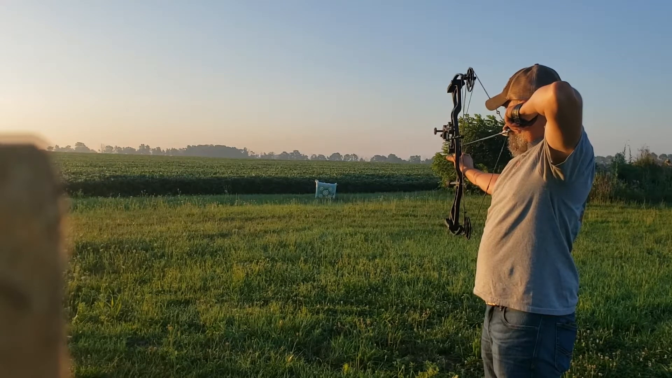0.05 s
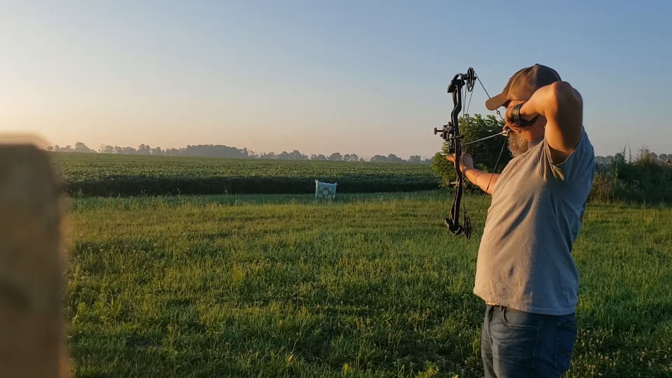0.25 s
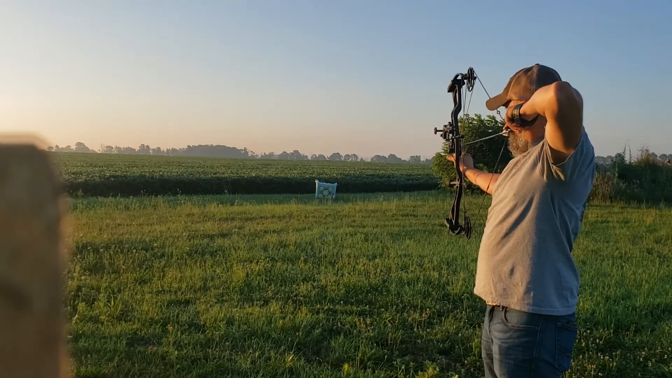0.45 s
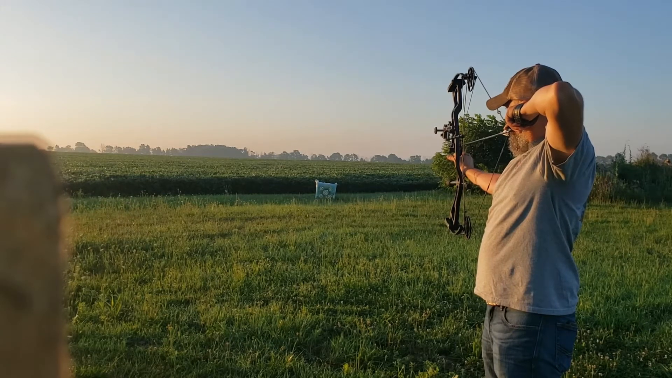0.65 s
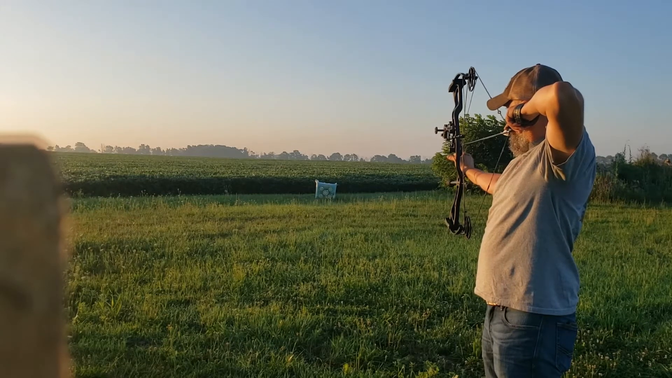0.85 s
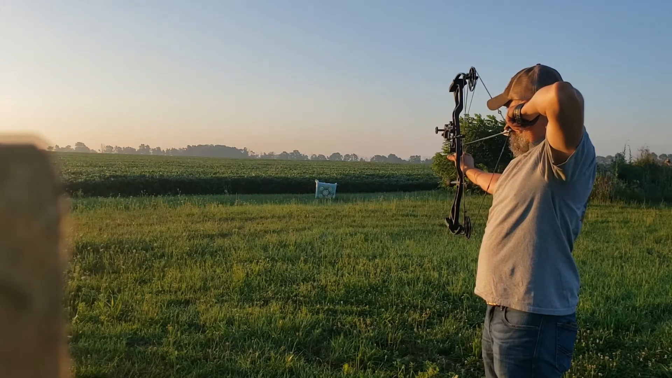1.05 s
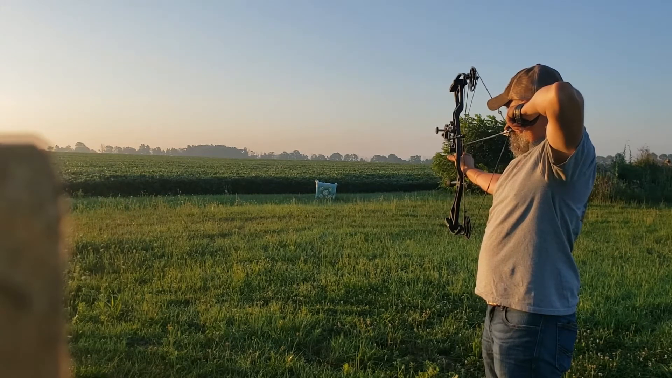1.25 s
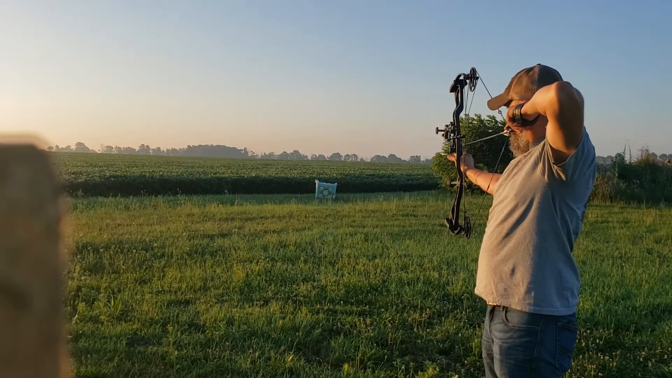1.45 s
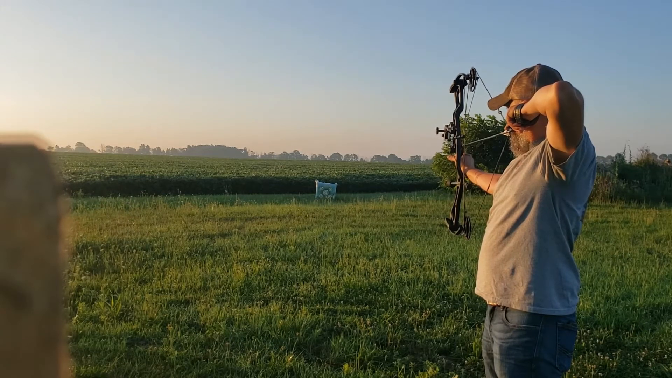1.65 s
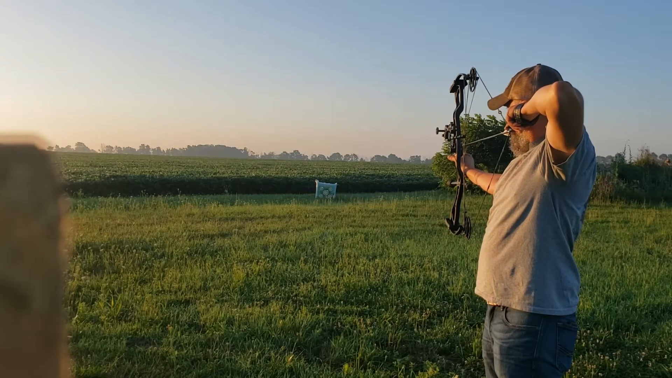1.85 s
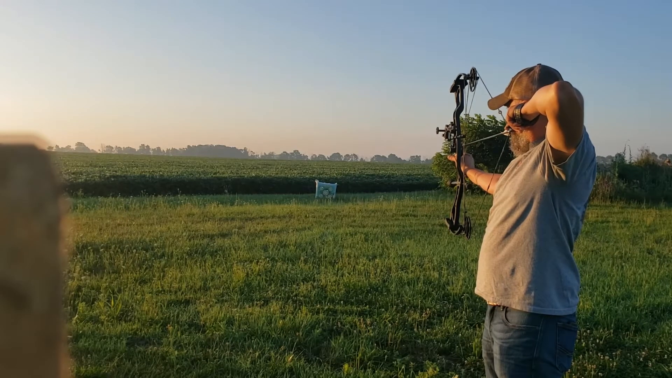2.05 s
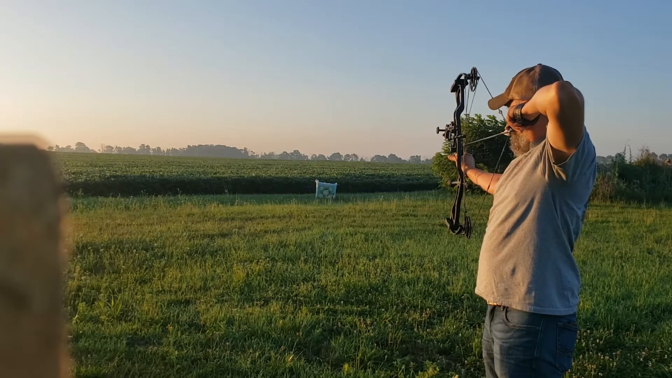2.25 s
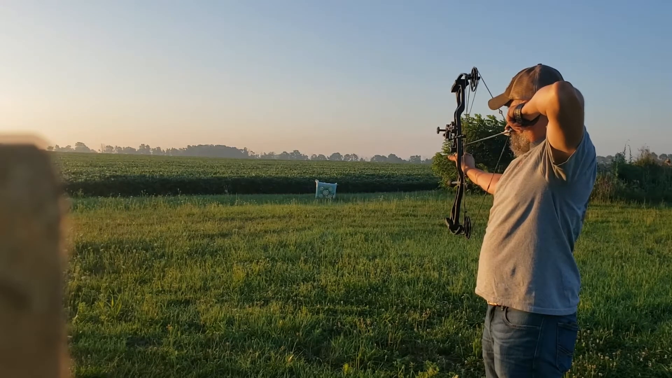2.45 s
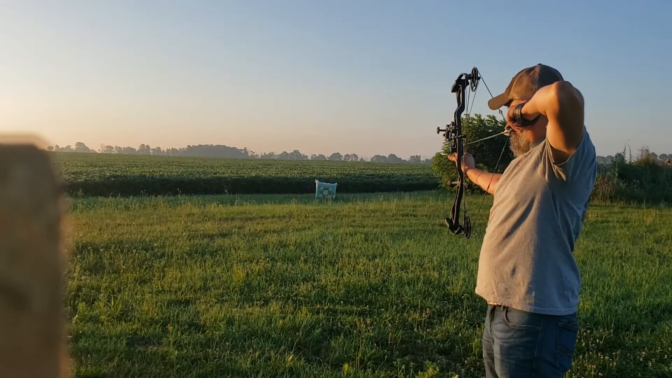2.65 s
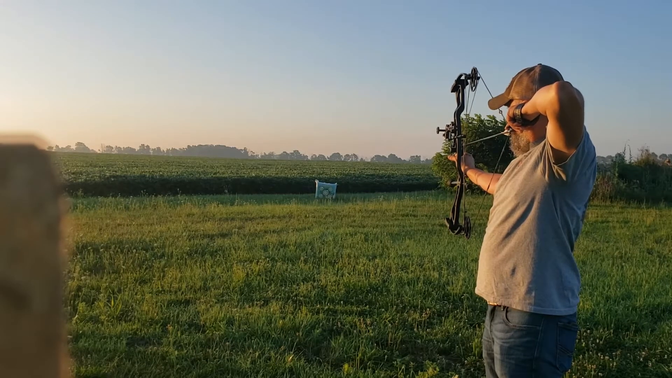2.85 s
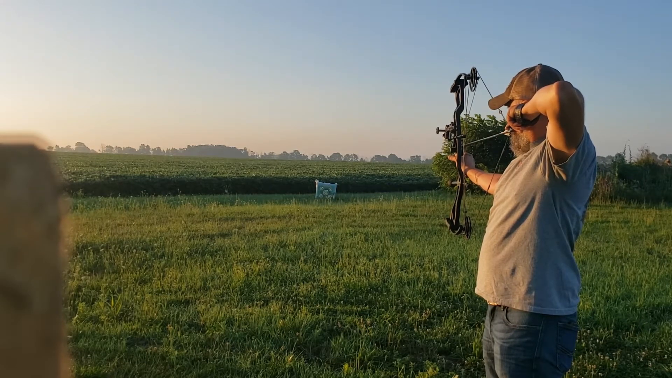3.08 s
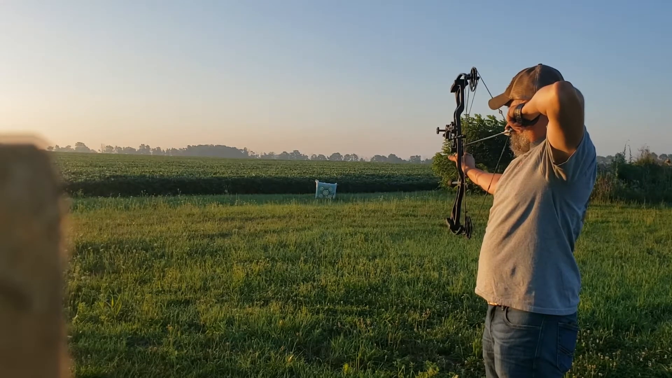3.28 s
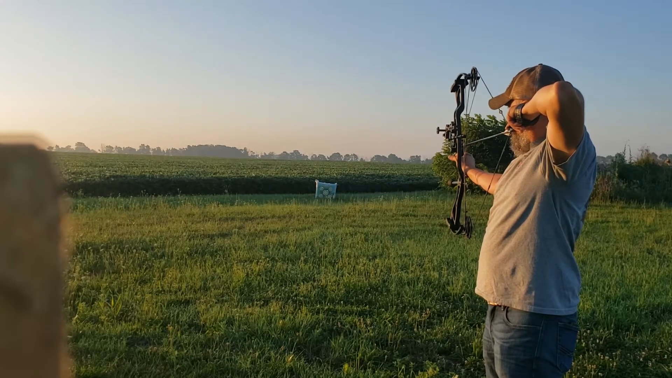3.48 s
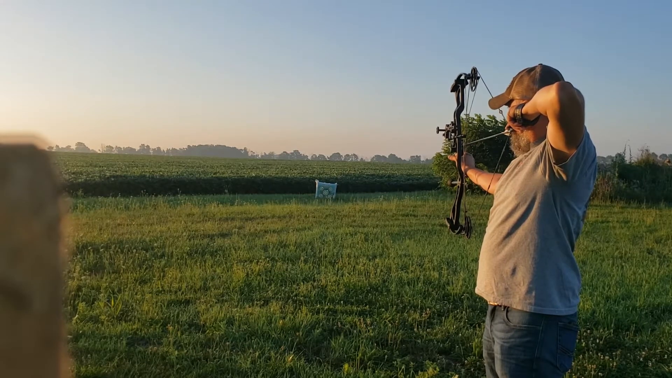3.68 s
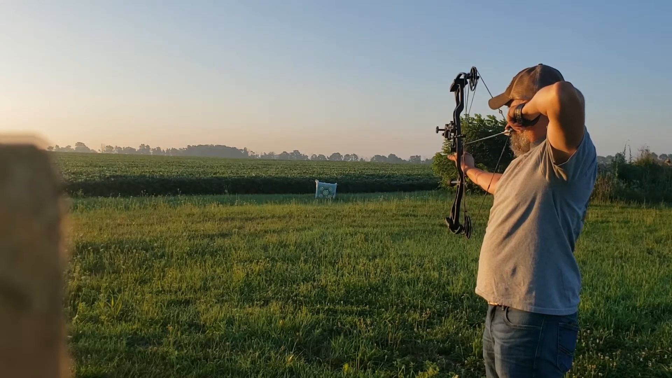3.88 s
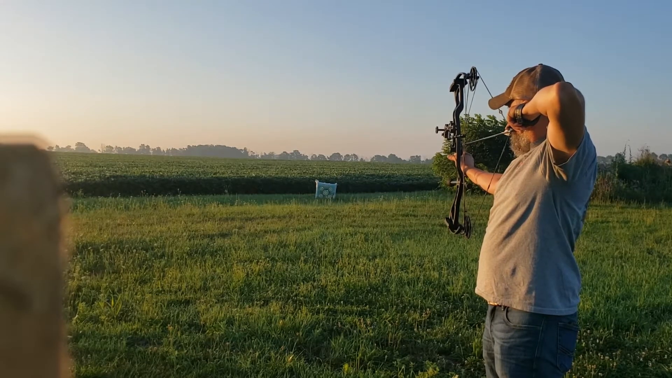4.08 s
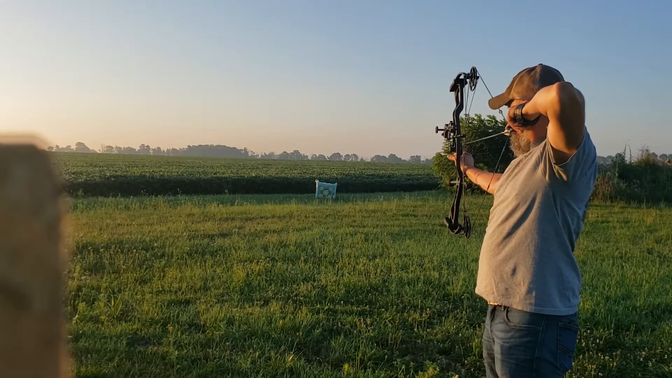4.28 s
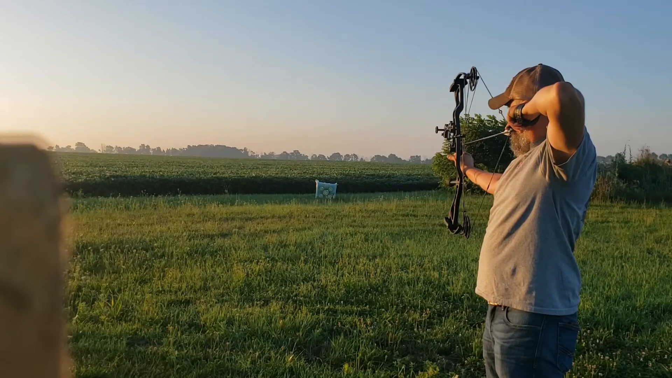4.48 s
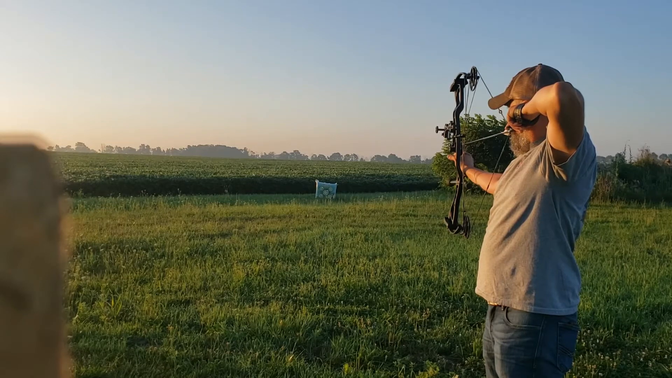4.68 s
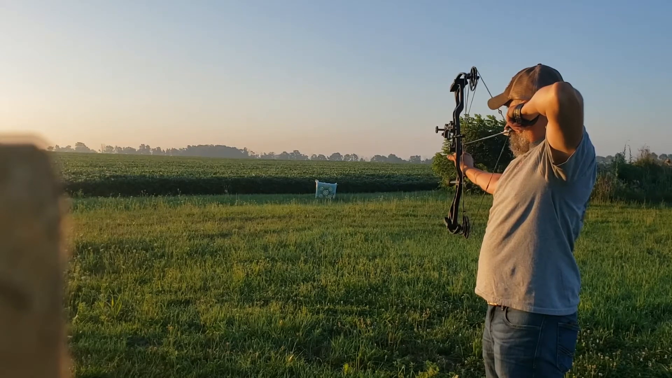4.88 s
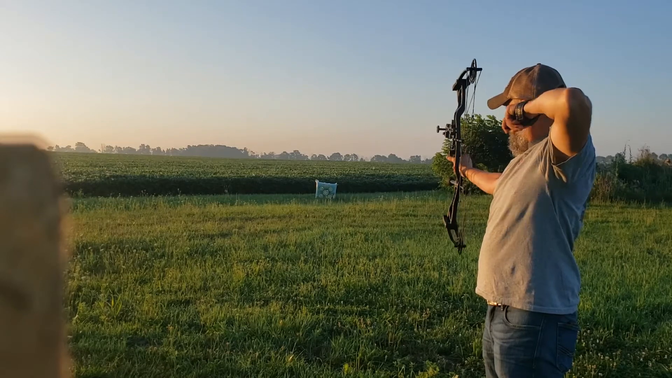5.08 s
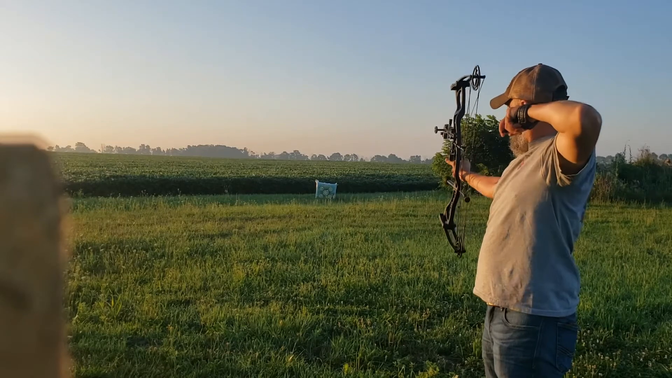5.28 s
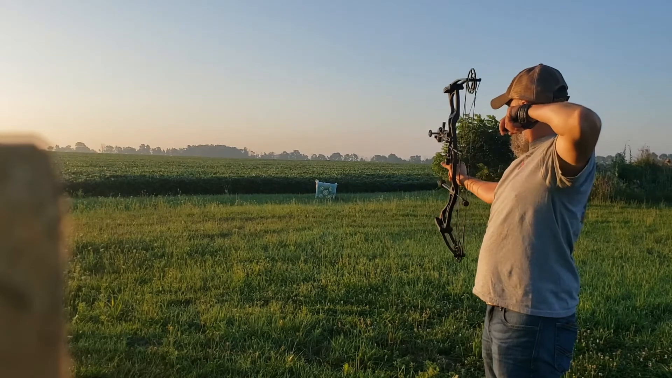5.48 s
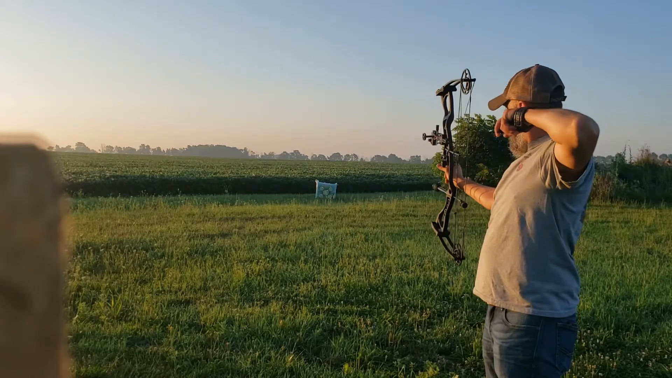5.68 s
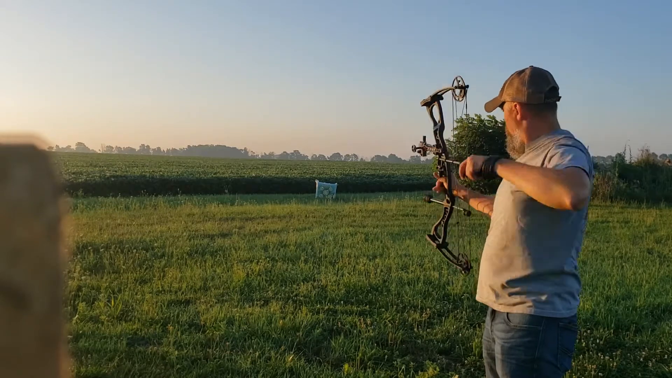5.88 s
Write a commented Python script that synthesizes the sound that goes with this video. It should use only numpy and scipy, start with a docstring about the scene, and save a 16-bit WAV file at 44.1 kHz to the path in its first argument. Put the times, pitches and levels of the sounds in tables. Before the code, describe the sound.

Soft wind and distant birdsong over an open field, then a compound bow snaps loudly and its arrow smacks a bag target.

```python
"""Light wind on the microphone and its hiss come first, with a short gritty rasp; small birds then whistle and
trill far off across an open field at dawn, as gliding sine notes over a blur of fainter peeps.
After two dry ticks close by, a compound bow is shot: the release aid clicks, the string rushes forward and slaps
its stop (hiss bursts), limbs and riser ring (decaying sines), and the arrow smacks a bag target (blows through
resonances, and thumps). Crop rows and a far tree line answer with decaying noise."""
import sys
import numpy as np
from scipy import signal
from scipy.fft import rfft, irfft, next_fast_len
from scipy.io import wavfile
from scipy.ndimage import map_coordinates

SR = 44100
rng = np.random.default_rng(int(sys.argv[2]) if len(sys.argv) > 2 else 0)


def unload_wav(signal):
    """Save mono or channel-first audio to the path in sys.argv[1] as 16-bit WAV at rate SR, clipped to [-1, 1]."""
    wavfile.write(
        sys.argv[1],
        SR,
        np.round(np.clip(np.atleast_2d(signal).T, -1, 1) * 32767).astype(np.int16),
    )


N = 261842

# Pan is left minus right. Levels are relative: gains, ports and distance effects may follow.
# wind buffeting on the microphone: time_s, level_db, pan_db
WIND = [(0, -58.5, -1), (.5, -55.5, 0), (1.05, -50.5, -9.5), (1.3, -57, -2), (1.6, -60.5, -1.5),
        (1.9, -55.5, -3), (2.6, -60, 0), (3.5, -57, -1.5), (4.2, -62.5, -1.5), (4.5, -62, -4.5),
        (4.9, -53, 5.5), (5.1, -54.5, -3), (5.66, -54, -3.5), (5.94, -59, -1)]
# spectrum of the wind and far rumble: frequency_hz, density_db (per Hz)
RUMBLE_SPECTRUM = [(12, -43), (20, -14.5), (49, -3.5), (70, 0), (140, -15), (266, -23), (398, -33),
                   (700, -51), (910, -77), (1540, -120)]
# spectrum of the hiss: frequency_hz, density_db (per Hz)
HISS_SPECTRUM = [(260, -34.5), (450, -9), (579, -12.5), (662, -12), (768, -13), (946, -13.5), (1520, -13),
                 (2110, -8.5), (3060, -17), (4180, -15.5), (5150, -18.5), (5800, -19.5), (6930, -29),
                 (13300, -16), (15700, -16.5)]
# likeness of the two ports in wind and hiss: frequency_hz, correlation (0-1)
PORT_LIKENESS = [(25, .5), (60, .8), (240, .85), (500, .4), (950, 0)]
# left-right lean of the hiss: frequency_hz, pan_db
HISS_LEAN = [(60, -1), (150, 4.5), (380, 0.5), (950, -0.5), (2380, -7.5), (5980, -5), (15000, 0)]
# how the housing shades the left port from bow and target: frequency_hz, pan_db
HOUSING_SHADOW = [(60, -6.5), (130, 0.5), (290, 0.5), (640, -5), (1410, 3), (3100, -10.5), (6820, -12),
                  (15000, -6)]
# left-right lean of the echoes: frequency_hz, pan_db
FIELD_LEAN = [(300, -2.5), (1400, -3), (3100, -4), (6800, -14.5), (15000, -5)]

# thin high rasps: start_s, length_s, centre_hz, width_hz, level_db
RASPS = [(0.021, 0.081, 7250, 900, -72.5), (1.336, 0.076, 7840, 900, -77.5),
         (3.615, 0.099, 10300, 2500, -79.5)]
# a blur of farther birds: time_s, level_db
CHORUS = [(0.8, -91.5), (1.4, -80), (3.45, -76), (4.0, -89.5)]
# figures the birds repeat, by name: pan_db, then notes as
# delay_s, length_s, first_hz, middle_hz, last_hz, level_db
FIGURES = { "arch": (-10, [(0, .042, 3950, 4500, 3800, 0), (.058, .022, 5600, 5200, 4400, 0.5)]),
           "dive": (-16, [(0, .04, 4750, 5370, 5360, -4), (.02, .05, 5000, 3350, 2800, -7),
           (.078, .036, 3600, 3880, 3800, 0.5)]), "skip": (-15, [(0, .04, 5060, 5320, 5460, 0),
           (.044, .022, 6700, 5450, 4550, -2), (.112, .048, 4100, 4330, 4060, -8)]),
           "sag": (-7, [(0, .046, 4800, 4380, 4270, 0)]), "flick": (-15, [(0, .07, 3900, 4480, 4600, -6),
           (.057, .038, 3720, 4460, 4900, 0), (.088, .016, 4830, 4340, 3950, 1.5)]),
           "drop": (-14, [(0, .035, 4750, 4050, 3650, 0)]), "slide": (-12, [(0, .059, 7500, 6900, 6100, 0),
           (.052, .05, 5900, 5700, 5650, 1.5)]), "squeak": (-18, [(0, .038, 6700, 7000, 7740, 0)]),
           "tew": (-17, [(0, .015, 5500, 5250, 5050, -7), (.011, .05, 5000, 4930, 4920, 0),
           (.074, .12, 5050, 4960, 4900, -11), (.228, .12, 4950, 4940, 4900, -17)]),
           "chirp": (-15, [(0, .033, 6100, 6070, 6070, 0), (.062, .05, 6070, 6060, 6050, -17)]),
           "chip": (0.6, [(0, .021, 3180, 3095, 3030, 0)])}
# figures sung one by one: start_s, figure, level_db
SONG = [(1.045, "slide", -94), (1.269, "arch", -84), (1.443, "arch", -78), (1.659, "dive", -73.5),
        (1.885, "dive", -76.5), (2.141, "sag", -76), (2.143, "skip", -72), (2.19, "squeak", -88),
        (2.431, "skip", -69), (2.456, "sag", -75), (2.594, "sag", -83), (3.075, "drop", -83),
        (3.166, "flick", -74), (3.363, "drop", -78), (3.44, "flick", -75), (3.626, "tew", -76),
        (3.96, "tew", -73.5), (4.28, "tew", -74.5)]
# figures sung at a steady pace: figure, start_s, period_s, levels_db (one each; None is skipped)
SERIES = [("chirp", 4.48, .169, [-72.5, -71, -74, -75]),
          ("chip", 4.366, .169, [-77, -77, -75.5, -73.5, None, -71])]
# notes held near one pitch: start_s, length_s, pitch_hz, level_db, pan_db
HELD = [(0.914, 0.04, 4700, -80, -4), (1.833, 0.051, 7090, -84.5, -17), (1.976, 0.033, 4910, -79.5, -16),
        (2.514, 0.086, 5320, -85.5, -19), (2.753, 0.13, 7390, -85.5, -16), (2.756, 0.16, 7940, -89, -20),
        (2.991, 0.25, 5290, -83.5, -19.5), (3.2, 0.41, 5290, -84, -20), (3.33, 0.34, 4830, -88.5, -19)]
# trills of quick upward sweeps:
# start_s, length_s, first_hz, middle_hz, last_hz, sweep_rate (per s), sweep_hz, level_db, pan_db
TRILLS = [(2.772, .172, 4750, 6350, 4500, 88, 1500, -70, -8),
          (3.32, .055, 5900, 6100, 6200, 200, 900, -76, -7),
          (3.595, .05, 6000, 6200, 6200, 200, 900, -77, -7),
          (3.725, .18, 3200, 3150, 3250, 60, 400, -87, 5), (3.735, .2, 2600, 2620, 2620, 60, 300, -86, 5),
          (4.05, .16, 3150, 3100, 3200, 60, 400, -87, 5), (4.055, .18, 2600, 2600, 2650, 60, 300, -86, 5)]
# tiny dry ticks close by: start_s, level_db
TICKS = [(4.655, -59), (4.825, -61)]

# contacts in the bow: start_s, kind, hiss_db, ring_db
BOW_CONTACTS = [(5.036, "click", -41.5, -76.5), (5.040, "click", -28, -68), (5.046, "rush", -40, -58),
                (5.055, "rush", -38.5, -51.5), (5.059, "rush", -24, -36), (5.0633, "crack", -12, -41),
                (5.0651, "slap", -15.5, -26.5), (5.071, "slap", -18, -34.5), (5.077, "slap", -20, -38),
                (5.088, "slap", -26.5, -34)]
# hiss of each kind of contact: t60_s, tilt_db (treble, per octave)
CONTACT_KINDS = {"click": (.021, 10), "rush": (.056, 4.8), "crack": (0.0068, 9), "slap": (0.027, .6)}
# spectrum of string and cams: frequency_hz, density_db (per Hz)
SLAP_SPECTRUM = [(88, -31.5), (150, -15), (330, -7), (542, -15), (1140, -9.5), (1460, 3.5), (2240, -23.5),
                 (3250, -11.5), (3580, -26), (4790, -18.5), (8590, -24), (11100, -22), (15700, -19.5)]
# modes of limbs and riser: pitch_hz, level_db, t60_s
RISER_MODES = [(242, -6, 0.18), (384, -5, 0.13), (416.5, -4, 0.081), (692, -15, 0.1), (758, -17, 0.21),
               (929, -8, 0.14), (982, -5, 0.16), (1143, -13.5, 0.1), (1468, -2.5, 0.12), (1472, -4, 0.19),
               (1530, -10, 0.11), (1610, -15, .14), (2099, -16.5, 0.16), (2404.5, -20.5, 0.0672),
               (2912, -21.5, .08)]
# the string humming on, one row: start_s, pitch_hz, t60_s, level_db
STRING_HUM = (5.066, 435, .52, -34.5)
# scattered returns of the shot: start_s, treble_db, middle_db (above the treble), t60_s
BOW_ECHO = [(5.075, -40, 5, 0.23), (5.15, -57, -5.5, 0.45), (5.282, -69, 6, .3)]
# treble of the shot's echo: frequency_hz, density_db (per Hz)
BOW_FIELD = [(1060, -34.5), (1800, -6.5), (4370, -5), (4750, -3.5), (6170, -7.5), (8480, -17.5),
             (11900, -9), (15700, -14)]
# middle of both echoes: frequency_hz, density_db
ECHO_MIDDLE = [(300, -41), (450, -2.5), (1000, -2), (1500, -7), (1900, -9), (2400, -63)]

# blows of arrow tip and shaft: start_s, level_db
SMACKS = [(5.37255, -7), (5.37295, -2), (5.3741, -6), (5.375, -6), (5.3765, -16)]
# resonances of the target face: centre_hz, width_hz, level_db
BAG_FACE = [(1100, 260, 2), (2200, 340, -1), (2770, 270, -1), (3450, 500, 0.5), (3900, 570, -3),
            (6740, 870, -20), (11800, 960, -16.5)]
# heaves of the stuffing, and its thud back twice across the field: start_s, pitch_hz, rise_s, t60_s, level_db
THUMPS = [(5.3728, 331.3, .001, 0.016, -17), (5.3837, 130, .003, .019, -6.5),
          (5.389, 78, 0.0047, 0.1, -25.5), (5.489, 106, 0.0046, 0.054, -39), (5.637, 72, 0.0054, 0.11, -37)]
# scattered returns of the hit: start_s, treble_db, middle_db (above the treble), t60_s
BAG_ECHO = [(5.374, -32.5, -11.5, 0.073), (5.395, -44.5, -9, .5), (5.447, -47, -3, 0.34),
            (5.475, -50, 2, 0.093), (5.505, -55, -16, 0.099), (5.572, -57.5, -5.5, 0.56), (5.7, -88, -7, 3)]
# treble of the hit's echo, also of the fabric: frequency_hz, density_db (per Hz)
BAG_FIELD = [(1240, -36), (2100, -3.5), (3250, 4.5), (6120, -10), (6880, -8), (9240, -34), (11600, -21),
             (15700, -31.5)]
# distinct returns from the tree line: start_s, level_db
TREE_SLAPS = [(5.587, -50.5), (5.618, -51)]

HISS_LEVEL_DB = -76.6654
RETURN_RISE_S = 0.0044
TOP_HZ = 15800
HALVES = np.array([[.5], [-.5]])  # shares a left-right difference between the ports


def amp(db):
    """Gain of a level in dB."""
    return 10 ** (np.asarray(db) / 20)


def unit(x):
    """x at rms 1."""
    return x / np.sqrt(np.mean(x ** 2) + 1e-30)


def along(points, hz):
    """Read (frequency_hz, value) points on a log frequency axis."""
    f, v = np.transpose(points)
    return np.interp(np.log(hz + 1), np.log(f + 1), v)


def curves(rows, outside=None):
    """One value per sample for each column after the time."""
    s, *cols = np.transpose(rows)
    return [np.interp(np.arange(N) / SR, s, c, outside, outside) for c in cols]


def wobble(rate, size=N):
    """A smooth random curve, rate knots a second."""
    knots = rng.standard_normal(int(size * rate / SR) + 4)
    return map_coordinates(knots, [np.arange(size) * rate / SR])


def filtered(x, response):
    """x times a complex response of frequency."""
    m = next_fast_len(x.shape[-1] + 8192)
    return irfft(rfft(x, m) * response(np.fft.rfftfreq(m, 1 / SR)), m)[..., :x.shape[-1]]


def stereo_noise(spectrum, likeness):
    """Noise of rms 1; the mid-side mix at each frequency sets how alike the ports are."""
    def shape(hz):
        turn = np.arccos(np.clip(along(likeness, hz), -1, 1)) / 2
        return amp(along(spectrum, hz)) * np.array([np.cos(turn), np.sin(turn)])
    mid, side = filtered(rng.standard_normal((2, N)), shape)
    return unit(np.array([mid + side, mid - side]))


def ports(x, lean, lag=0):
    """Left-right level over frequency, and the seconds by which left lags."""
    def response(hz):
        return amp(HALVES * along(lean, hz)) * np.exp(-2j * np.pi * hz * HALVES * lag)
    return filtered(x, response)


def add(track, s, sound):
    """Mix a sound in at a time."""
    part = track[..., round(s * SR):round(s * SR) + sound.shape[-1]]
    part += sound[..., :part.shape[-1]]


def air():
    """Gusts thud on the ports in the deep bass; far rumble and hiss above are steadier."""
    buffet_db, pan_db = curves(WIND)
    lumps = amp(3 * wobble(8.7) + 0.93 * np.array([wobble(18), wobble(6.2)]))
    low = stereo_noise(RUMBLE_SPECTRUM, PORT_LIKENESS)
    deep = filtered(low, lambda hz: 1 / (1 + (hz / 130) ** 4))
    buffet = 1.213 * amp(buffet_db + pan_db * HALVES) * unit(lumps) * deep
    # the far rumble follows the gusts only in part
    far_db = -56.5 + .4 * (buffet_db - np.mean(buffet_db)) + 1.2 * wobble(6.6)
    far = amp(far_db) * (low - deep)
    hiss = amp(HISS_LEVEL_DB) * stereo_noise(HISS_SPECTRUM, PORT_LIKENESS)
    return buffet + far + ports(hiss, HISS_LEAN)


def rasps():
    """Short bands of gritty treble: fluttering noise with a sharp front, through a resonance."""
    out = np.zeros((2, N))
    for s, length, centre_hz, width_hz, db in RASPS:
        t = np.arange(int(length * SR)) / SR
        flutter = amp(4.9 * wobble(214, size=len(t)) - 14 * t / length)
        grit = rng.standard_normal((2, len(t))) * flutter * (1 - (t / length) ** 3)
        grit = grit * (1 + 1.5 * np.exp(-t / .006))  # a sharper front

        def band(hz):
            return (hz > 6800) / (1 + ((hz - centre_hz) / width_hz) ** 2) ** 0.93
        add(out, s, amp(db) * unit(filtered(grit, band)))
    return out * amp([[-3], [3]])


def glide(length, first_hz, middle_hz, last_hz):
    """Progress 0-1 and a pitch arc through three points."""
    u = np.arange(int(length * SR)) / (length * SR)
    arc_hz = first_hz * (1 - u) * (1 - 2 * u) + 4 * middle_hz * u * (1 - u) + last_hz * u * (2 * u - 1)
    return u, arc_hz


def tone(hz):
    """A sine that follows a pitch curve."""
    return np.sin(2 * np.pi * np.cumsum(hz) / SR)


def chorus(count=1400):
    """Many faint overlapping peeps at chance times and pitches."""
    out = np.zeros((2, N))
    for when, pitch, bend, side in rng.random((count, 4)):
        hz = 3700 + 3700 * pitch ** 1.4
        middle_hz, last_hz = hz * (1 + .06 * (bend - .5)), hz * (1 + .12 * (bend - .5))
        u, arc_hz = glide(.02, hz, middle_hz, last_hz)
        peep = np.sin(np.pi * u) * tone(arc_hz)
        add(out, .8 + 3.2 * when, amp(6 * (side - .5) * np.array([[1], [-1]])) * peep)
    return unit(out)


def notes():
    """Every whistled note as start_s, length_s, first_hz, middle_hz, last_hz, level_db, pan_db."""
    figures = list(SONG)
    for name, s, period, levels in SERIES:
        figures += [(s + k * period, name, db) for k, db in enumerate(levels) if db is not None]
    sung = []
    for s, name, db in figures:
        pan_db, figure_notes = FIGURES[name]
        for delay, length, first_hz, middle_hz, last_hz, note_db in figure_notes:
            sung.append((s + delay, length, first_hz, middle_hz, last_hz, db + note_db, pan_db))
    return sung + [(s, length, hz, hz, hz, db, pan_db) for s, length, hz, db, pan_db in HELD]


def whistles():
    """Gliding sine notes that flutter on their way over the field."""
    out = np.zeros((2, N))
    for s, length, first_hz, middle_hz, last_hz, db, pan_db in notes():
        u, hz = glide(length, first_hz, middle_hz, last_hz)
        flutter = amp(3 * wobble(110, size=len(u)))
        # held pitches carry, slides fade
        flutter = flutter / (1 + np.abs(np.gradient(hz)) * SR / 60000) ** .7
        note = np.sin(np.pi * u) ** 0.5 * flutter * tone(hz + 45 * wobble(150, size=len(u)))
        add(out, s, amp(db + 6 + pan_db * HALVES) * note)
    return out


def trills():
    """Quick upward sweeps, each swelling and closing, along a pitch arc."""
    out = np.zeros((2, N))
    for s, length, first_hz, middle_hz, last_hz, rate, sweep_hz, db, pan_db in TRILLS:
        u, hz = glide(length, first_hz, middle_hz, last_hz)
        beat = u * length * rate % 1
        fading = amp(2 - 5.7 * u + 3.7 * wobble(60, size=len(u)))
        envelope = np.sin(np.pi * u) ** 0.48 * fading * np.sin(np.pi * beat) ** 0.61
        note = envelope * tone(hz + sweep_hz * (beat - .5))
        add(out, s, amp(db + 7.5 + pan_db * HALVES) * note)
    return out


def birds():
    """Peeps, whistles and trills smear in the leaves; a band of noise blurs the farthest birds."""
    chorus_gain = amp(curves(CHORUS, -120)[0] + [[-6], [0]])
    out = amp(-7) * chorus_gain * chorus() + whistles() + trills()
    t = np.arange(SR) / SR
    leaves = amp(-60 * t / .6 + 4 * wobble(25, size=len(t))) * rng.standard_normal((2, len(t)))
    leaves = leaves / np.linalg.norm(leaves[0])
    out = out + amp(-9.5) * signal.fftconvolve(out, leaves, axes=1)[:, :N]
    blur_spectrum = [(2800, -55), (3600, -8.5), (5200, 4.5), (7200, -5.5), (8200, -45)]
    blur = stereo_noise(blur_spectrum, [(5000, 0.0021)])
    return out + amp(-1.5 + 2.8 * wobble(14)) * chorus_gain * blur


def ticks():
    """Millisecond cracks of brightened noise."""
    out, t = np.zeros((2, N)), np.arange(SR // 50) / SR
    for s, db in TICKS:
        crack = np.diff(rng.standard_normal((2, len(t) + 1)))
        add(out, s, amp(db - 60 * t / 0.0055 - 3 + [[-4], [1]]) * crack)
    return out


def returns(rows):
    """Treble and middle envelopes: each return swells quickly and dies away; their powers add."""
    power = np.zeros((2, N))
    for s, db, middle_db, t60 in rows:
        t = np.maximum(np.arange(N) / SR - s, 0)
        decay = amp(db + np.array([[0], [middle_db]]) - 60 * t / t60)
        power = power + (decay * (1 - np.exp(-t / RETURN_RISE_S))) ** 2
    return np.sqrt(power)


def echo(rows, treble, top_db, loss_db):
    """Scattered returns, nearly unrelated at the ports in the treble; air eats loss_db a second of the top."""
    treble_gain, middle_gain = returns(rows)
    since = np.arange(N) / SR - rows[0][0]
    high = stereo_noise([(900, -73)] + treble, [(3000, 0.012)])
    top = filtered(high, lambda hz: hz > 8000)
    high = high - top + amp(top_db - loss_db * np.abs(since)) * top
    middle = middle_gain * stereo_noise(ECHO_MIDDLE, [(500, .5), (1400, 0)])
    return amp(2.4 * wobble(70)) * (treble_gain * high + middle)


def bow():
    """Each contact hisses briefly and rings the limbs and riser at new strengths; the string hums on."""
    out, t = np.zeros((2, N)), np.arange(SR // 2) / SR
    for s, kind, hiss_db, ring_db in BOW_CONTACTS:
        t60, tilt_db = CONTACT_KINDS[kind]

        def colour(hz):
            octaves = np.log2(np.clip(hz, 300, 11000) / 6000)
            return amp(along(SLAP_SPECTRUM, hz) + tilt_db * octaves)
        # noise common to both ports plus noise of their own
        scrape = rng.standard_normal(len(t)) + 0.88 * rng.standard_normal((2, len(t)))
        scrape = unit(filtered(scrape, colour)) * amp(hiss_db - 60 * t / t60) * (1 - np.exp(-t / .0005))
        ring = np.zeros(len(t))
        for hz, db, mode_t60 in RISER_MODES:
            strength_db = db + 2 * rng.standard_normal()
            ring += amp(strength_db - 60 * t / mode_t60) * np.sin(2 * np.pi * hz * t)
        ring = ring * amp(2.1 * wobble(60, size=len(t)))  # the ring wavers a little at random
        add(out, s, scrape + amp(ring_db) * ring)
    s, hz, t60, db = STRING_HUM
    add(out, s, amp(db - 60 * t / t60) * np.sin(2 * np.pi * hz * t))
    field = echo(BOW_ECHO, BOW_FIELD, top_db=1.5, loss_db=15.5)
    return ports(out, HOUSING_SHADOW, lag=0.00017) + ports(field, FIELD_LEAN)


def face(hz):
    """Response of the target face: band resonances of alternating sign."""
    total = 0
    for k, (centre, width, db) in enumerate(BAG_FACE):
        total = total + (-1) ** k * amp(db) * 1j * hz * width / (centre ** 2 - hz ** 2 + 1j * hz * width)
    return total


def tree_line():
    """Distinct returns from the far trees: short noise bursts around 3 kHz."""
    out, t = np.zeros((2, N)), np.arange(SR // 4) / SR
    for s, db in TREE_SLAPS:
        noise = rng.standard_normal((2, len(t)))
        slap = unit(filtered(noise, lambda hz: np.exp(-np.log(hz / 3200 + 0.0082) ** 2 / 0.133)))
        add(out, s, amp(db - 60 * t / 0.064) * slap)
    return out


def target():
    """Sharp blows through the face's resonances, then the stuffing heaves and the field answers."""
    blows, t = np.zeros(N), np.arange(SR // 4) / SR
    for s, db in SMACKS:
        blows[round(s * SR)] = -amp(db)
    smack = amp(13.0) * filtered(blows, face)
    fabric = filtered(rng.standard_normal(len(t)), lambda hz: amp(along(BAG_FIELD, hz)))
    add(smack, 5.3732, amp(-19 - 60 * t / .03) * fabric)
    crack = (1 - np.exp(-t / .0001)) * np.sin(2 * np.pi * 4700 * t)  # the tip breaks the face
    add(smack, 5.37295, -amp(4 - 60 * t / .0008) * crack)
    for s, hz, rise, t60, db in THUMPS:
        thump = (1 - np.exp(-t / rise)) * np.sin(2 * np.pi * hz * t)
        add(smack, s, amp(db - 60 * t / t60) * thump)
    # roll off the deep bass of the hit below about 45 Hz
    smack = filtered(smack, lambda hz: (1j * hz / (45 + 1j * hz)) ** 2)
    field = tree_line() + echo(BAG_ECHO, BAG_FIELD, top_db=6.5, loss_db=39)
    return ports(smack, HOUSING_SHADOW, lag=0.000148) + ports(field, FIELD_LEAN)


def scene():
    """Everything that reaches the two ports."""
    return air() + rasps() + birds() + ticks() + bow() + target()


def record(dry):
    """The microphone's recorder keeps nothing above its band limit, fading over the last 250 Hz."""
    return filtered(dry, lambda hz: np.clip((TOP_HZ - hz) / 250, 0, 1) ** .5)


dry = scene()
out = record(dry)
unload_wav(out)
```